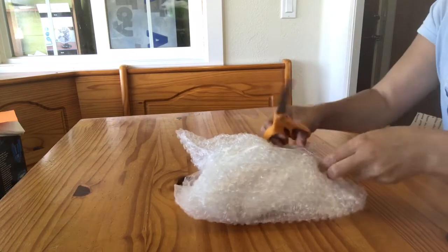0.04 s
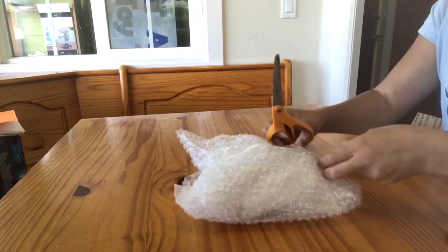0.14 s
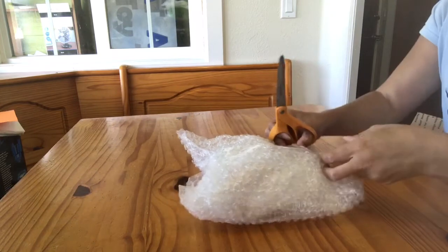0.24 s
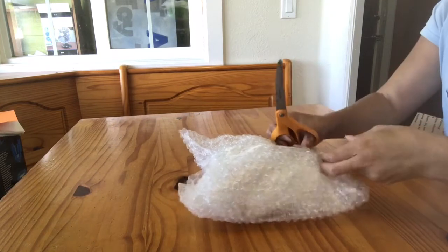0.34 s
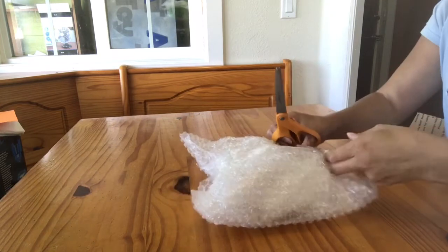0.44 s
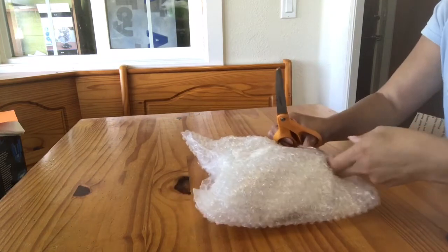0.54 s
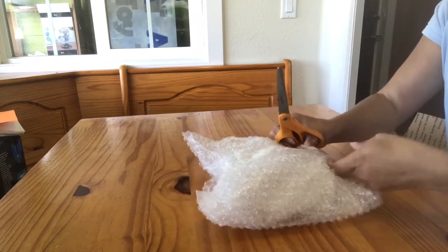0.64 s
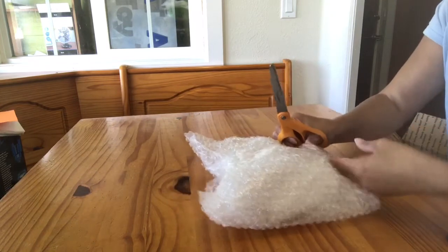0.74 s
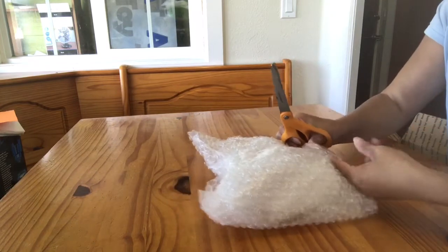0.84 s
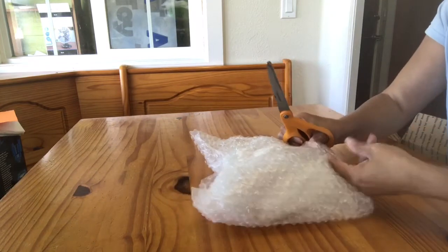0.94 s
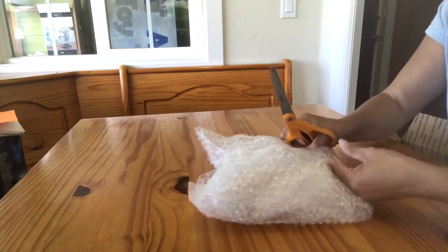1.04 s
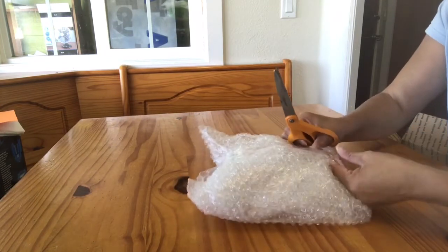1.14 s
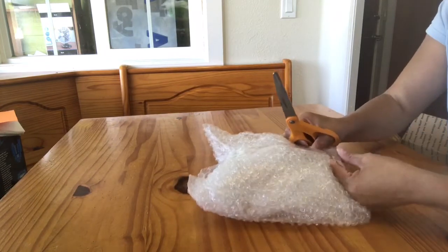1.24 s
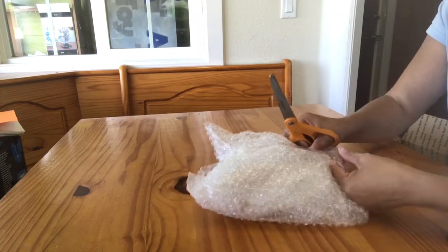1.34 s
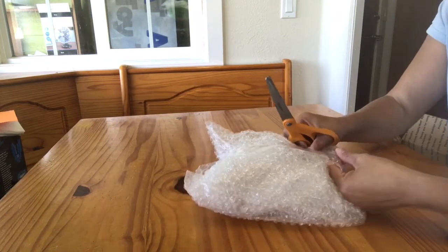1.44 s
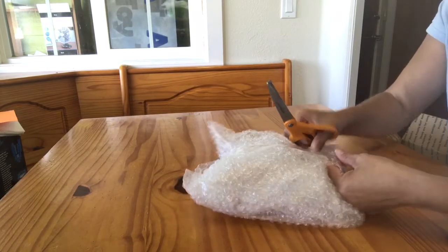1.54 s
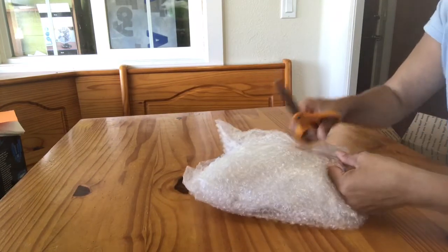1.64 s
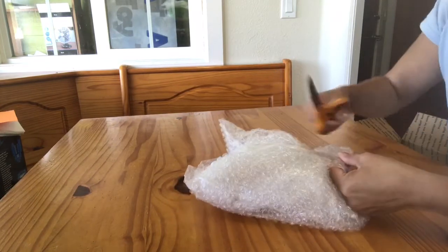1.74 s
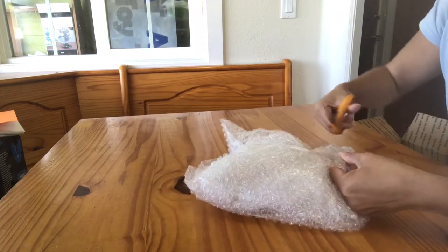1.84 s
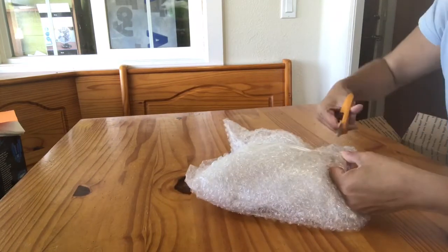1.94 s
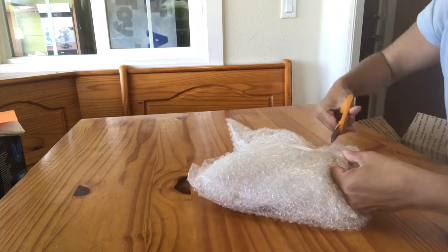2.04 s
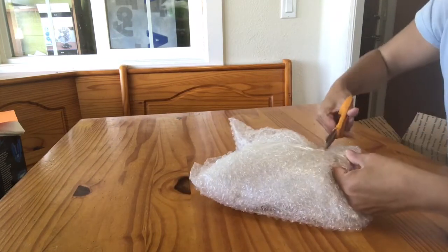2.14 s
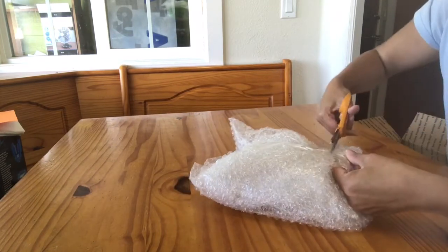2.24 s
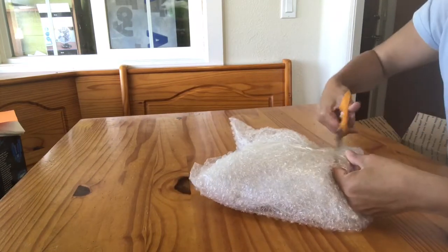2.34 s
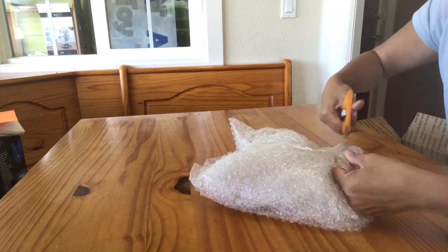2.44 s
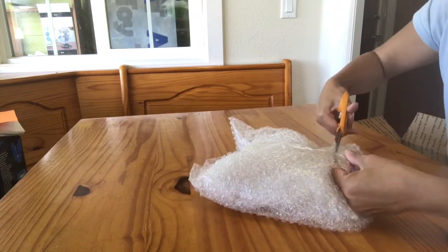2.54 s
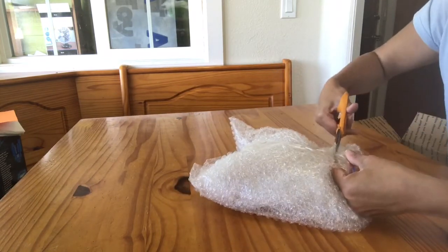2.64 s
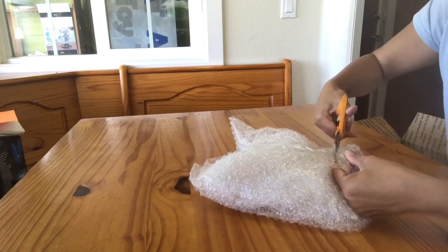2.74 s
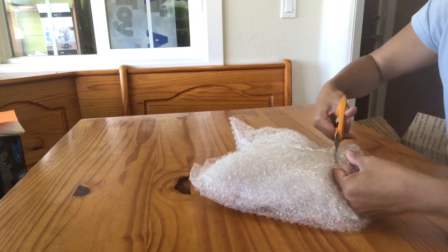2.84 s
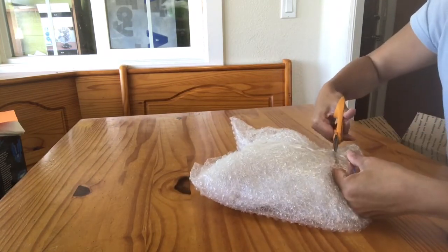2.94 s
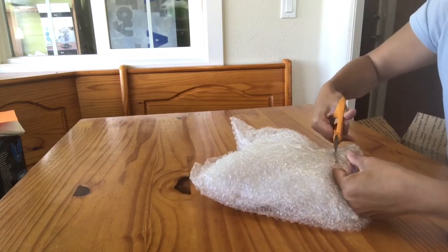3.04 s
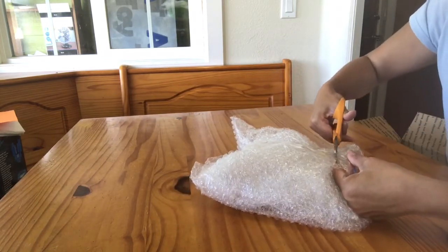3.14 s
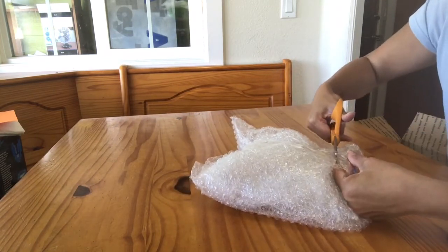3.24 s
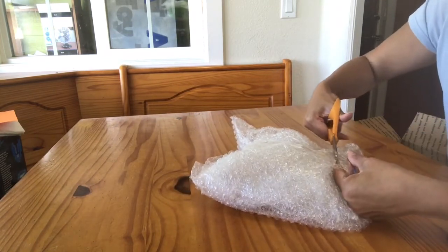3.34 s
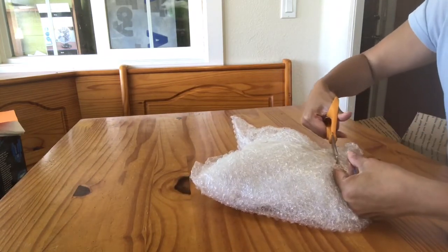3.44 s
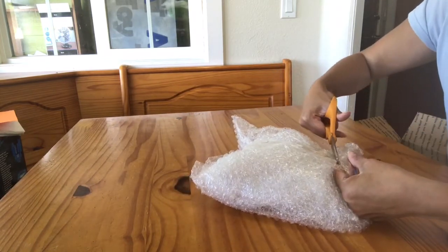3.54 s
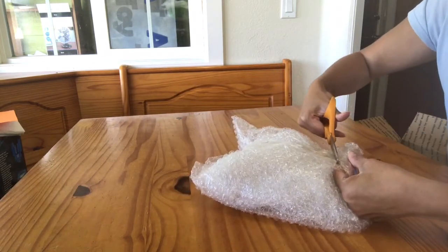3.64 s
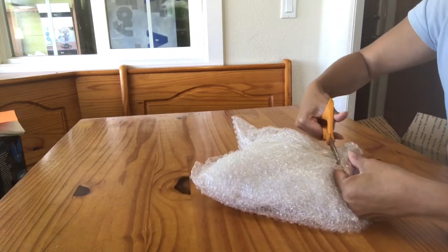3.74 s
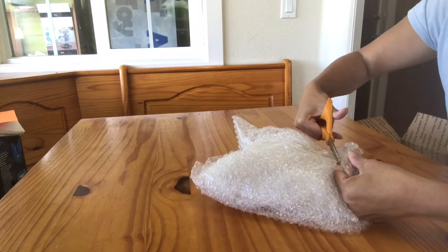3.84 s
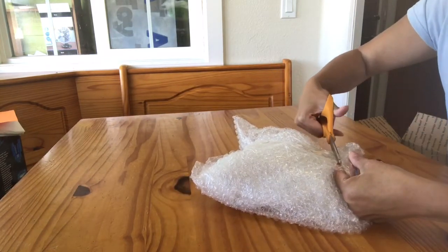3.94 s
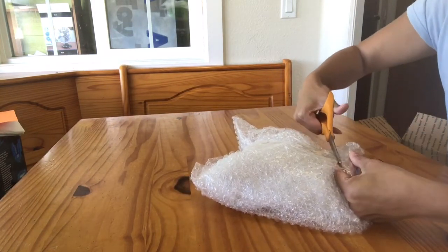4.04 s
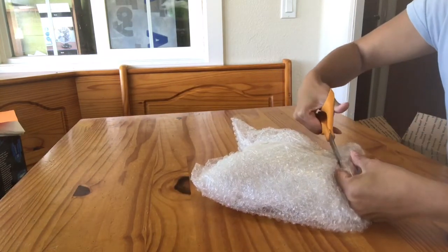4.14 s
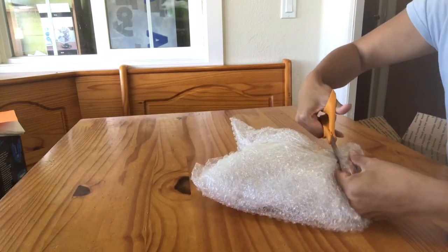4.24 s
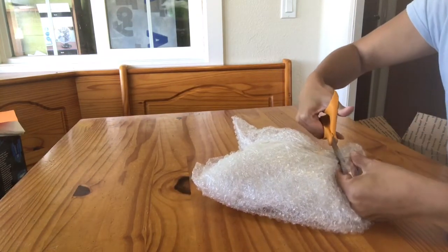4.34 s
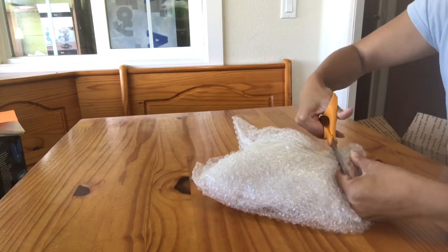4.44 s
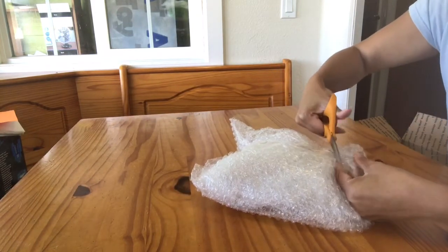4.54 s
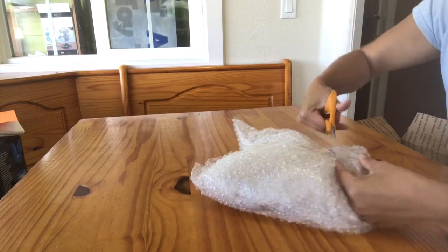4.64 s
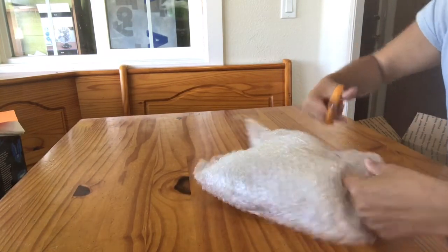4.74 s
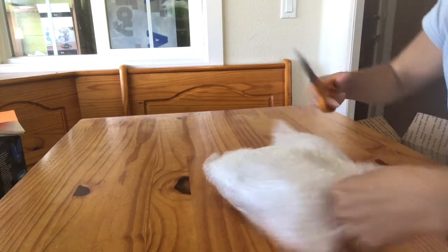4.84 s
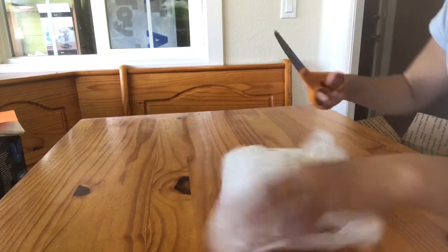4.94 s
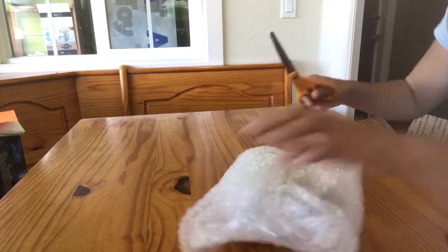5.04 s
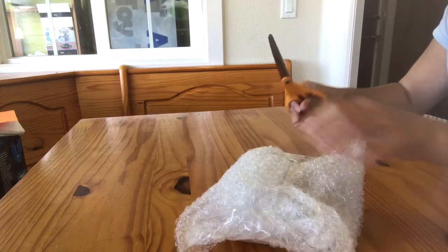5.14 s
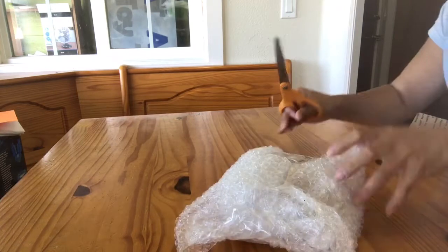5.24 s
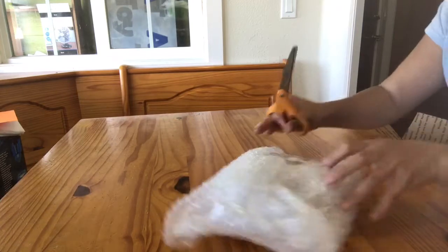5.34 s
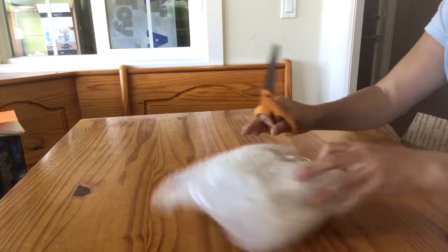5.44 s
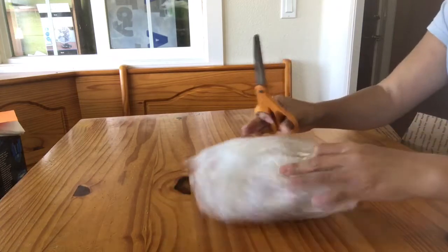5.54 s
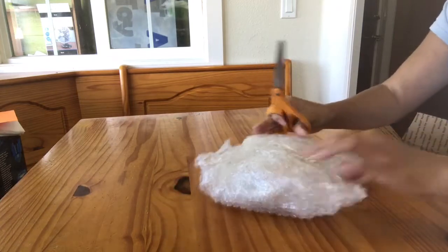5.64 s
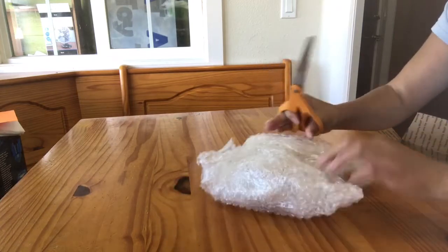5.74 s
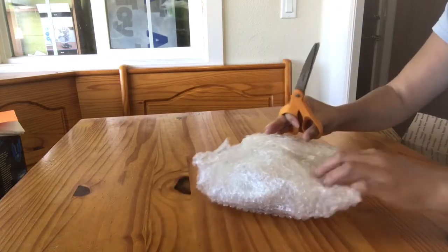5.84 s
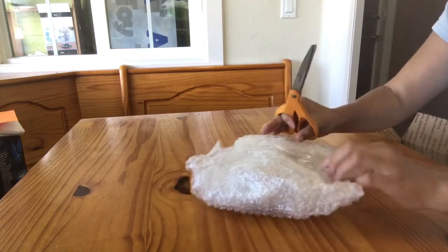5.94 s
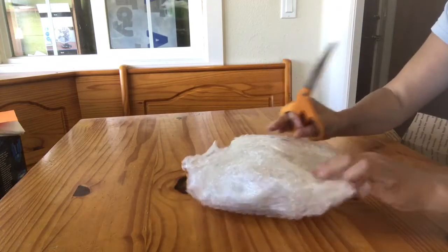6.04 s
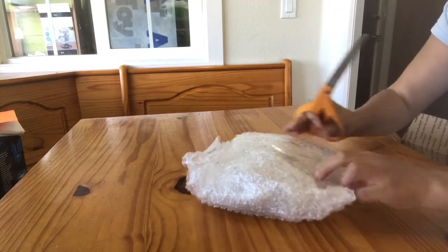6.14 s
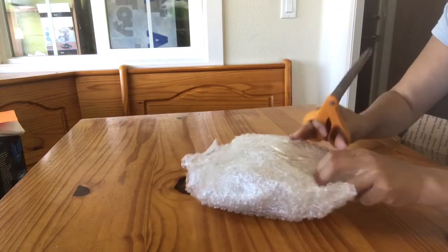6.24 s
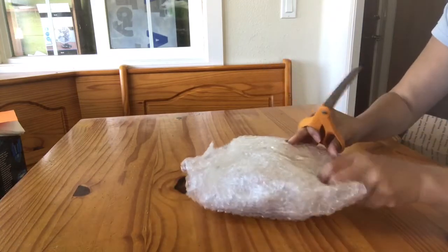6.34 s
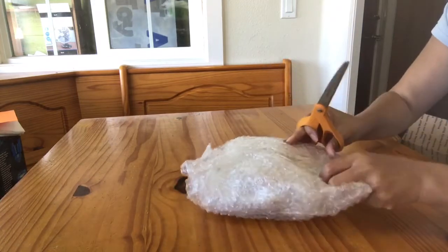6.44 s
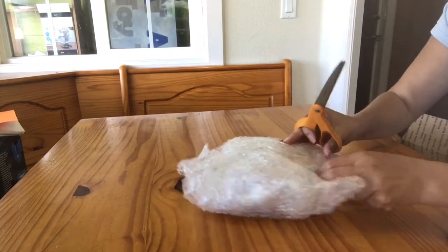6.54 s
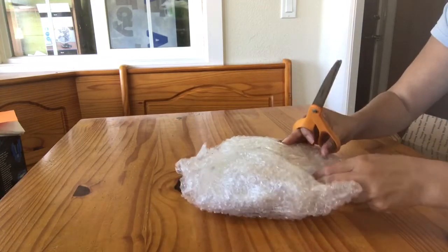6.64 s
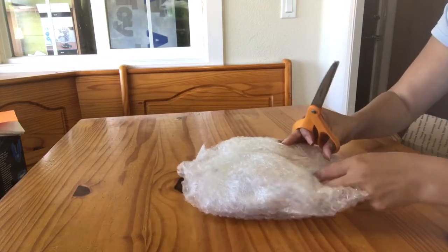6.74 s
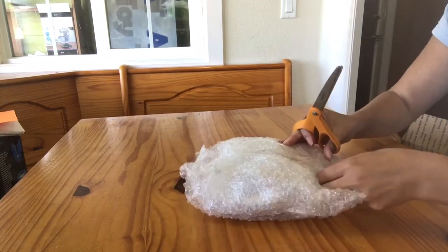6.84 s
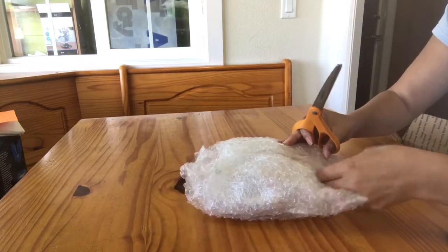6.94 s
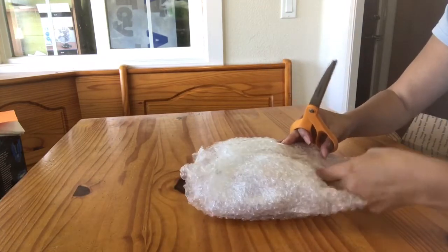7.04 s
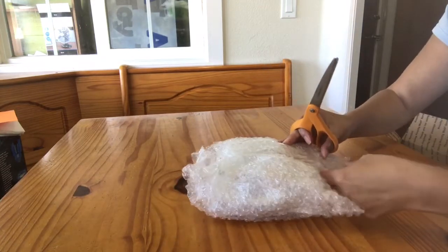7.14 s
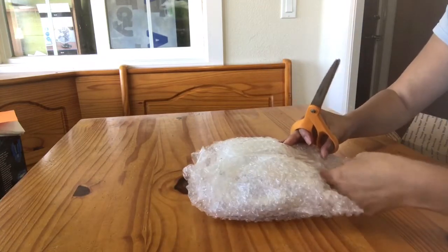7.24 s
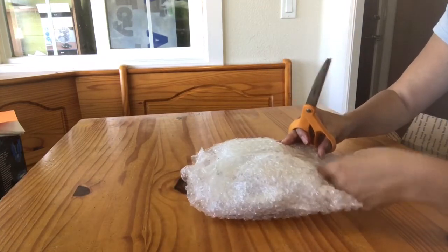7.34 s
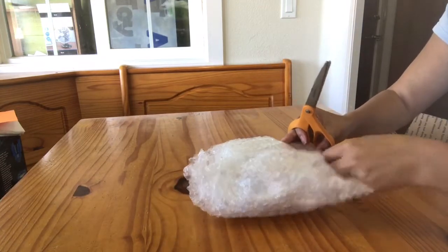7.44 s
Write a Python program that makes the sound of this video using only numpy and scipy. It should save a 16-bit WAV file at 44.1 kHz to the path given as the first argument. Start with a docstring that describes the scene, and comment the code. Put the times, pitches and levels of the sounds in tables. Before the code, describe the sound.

Bubble wrap crinkles and crackles as hands pick at it and snip it on a wooden table, with sharp snaps and soft bumps.

```python
"""In a small kitchen, a parcel in bubble wrap is picked at, snipped and turned over on a wooden table.
The rustle is dense trains of tiny filtered clicks, the buckles of the film, that follow the hands.
Creases, tape and cut bubbles snap: a flurry of slips in the film, then a short ring of the air cells.
Bumps excite decaying modes of the table top, a blade draws one faint squeak, and sparse echoes
and coloured noise give the room's answer and its quiet."""
import sys
import numpy as np
from scipy import signal
from scipy.fft import rfft, irfft
from scipy.io import wavfile
from scipy.ndimage import uniform_filter1d

SR = 44100
rng = np.random.default_rng(int(sys.argv[2]) if len(sys.argv) > 2 else 0)


def dump_mix(stems):
    """Bounce the given channels to the path in sys.argv[1] as a 16-bit WAV at rate SR."""
    frames = np.atleast_2d(stems).T  # one column per channel
    limited = np.clip(frames, -1, 1)  # hard clip at full scale
    pcm = np.round(limited * 32767).astype(np.int16)
    wavfile.write(sys.argv[1], SR, pcm)


N = 329868
TIME = np.arange(N) / SR

# The loudest snaps of the plastic, each a crack of film and a ring of air cells; levels before the trims:
# start_s [s], crack_db [dB], crack_centre_hz [Hz], ring_db [dB], ring_hz [Hz]
SNAPS = [(.161, -39, 4400, -34, 800), (.208, -40.5, 4930, -38, 800), (0.2986, -35, 5800, -37.5, 1700),
         (.3837, -31.5, 5160, -35.5, 1170), (0.489, -36, 3540, -42, 980), (.58, -49, 4200, -42, 880),
         (0.623, -48, 4200, -37.5, 1020), (.807, -42.5, 3400, -33.5, 1080),
         (0.8158, -32, 3230, -30.5, 1070), (0.9421, -23.5, 3600, -24.5, 1020),
         (1.1039, -36, 4980, -37, 1030), (1.1334, -31, 5300, -36, 1160), (1.1696, -35, 6600, -34.5, 1060),
         (1.2105, -31.5, 6140, -34.5, 1320), (1.224, -32.5, 5640, -28.5, 1060),
         (1.232, -28, 5500, -55, 1200), (1.246, -27, 5300, -34, 930), (1.2538, -29, 5870, -25.5, 1340),
         (1.274, -22.5, 4630, -25, 1380), (1.2762, -24.5, 4400, -25, 1330), (1.2982, -29, 4850, -41, 1130),
         (1.308, -30, 6330, -51, 1340), (1.3284, -32, 9200, -61, 1340), (1.34, -28, 7600, -53, 1130),
         (1.3538, -29.5, 7950, -46, 1670), (1.3684, -29.5, 7400, -57, 1320),
         (1.3969, -22.5, 8000, -40, 1650), (2.3878, -55, 3800, -45, 900), (2.463, -47.5, 3820, -48, 1220),
         (2.5694, -40, 4400, -39, 970), (2.6317, -46.5, 6900, -77, 1040), (3.0133, -49, 4570, -54.5, 1220),
         (3.238, -54, 4980, -62.5, 1200), (3.3818, -39.5, 5420, -52, 1580), (3.42, -56, 4000, -48.5, 1500),
         (3.495, -50.5, 4300, -55, 1235), (3.5508, -46, 6000, -63, 1550), (3.5788, -46, 5330, -46.5, 1580),
         (3.6726, -47, 4880, -62, 1100), (3.853, -60, 3930, -54.5, 1070), (3.9075, -51, 5190, -52, 1330),
         (3.9671, -37.5, 4260, -37.5, 1320), (4.0603, -36.5, 4320, -31.5, 1160),
         (4.1612, -43.5, 4360, -58, 990), (4.2211, -40, 6800, -43, 780), (4.2513, -38, 5100, -65, 1080),
         (4.2694, -40, 5300, -40.5, 1410), (4.2948, -36.5, 4050, -42, 1370),
         (4.5473, -37.5, 4090, -51, 920), (4.5555, -39, 4870, -40, 1040), (4.5697, -25, 3230, -30.5, 820),
         (4.579, -36, 3220, -42, 1290), (4.609, -36.5, 4070, -33, 1400), (5.0774, -40, 5660, -48, 1525),
         (5.247, -54, 7900, -60, 1300), (5.4141, -35, 6100, -45, 1200), (5.8695, -39, 6700, -41.5, 1150),
         (5.8799, -42, 4300, -37, 1130), (6.1059, -37.5, 5590, -62, 1600), (6.272, -45, 4580, -65, 1400),
         (6.627, -39, 4360, -38.5, 970), (6.7764, -47, 4700, -36.5, 860), (6.8324, -32, 4940, -34, 1110),
         (6.9183, -34.5, 4040, -35, 890), (6.9438, -38.5, 4200, -53, 1000), (6.966, -48, 5500, -42, 695),
         (6.9963, -39, 4420, -43.5, 1380), (7.0269, -34.5, 3280, -32, 1360), (7.072, -52, 3970, -35, 800),
         (7.13, -40.5, 2580, -43, 1420), (7.1635, -44, 3000, -41, 900), (7.465, -33, 4500, -45, 1720)]


def amp(db):
    """A level in decibels is twenty times the logarithm of the amplitude gain."""
    return 10 ** (np.asarray(db) / 20)


def evened(x):
    """Normalises mean power: scales to an rms of one."""
    return x / np.sqrt(np.mean(x ** 2) + 1e-20)


def burst(x):
    """Normalises energy: scales a short sound to that of two milliseconds at an rms of one."""
    return x * np.sqrt(.002 * SR) / np.linalg.norm(x)


def read(points, hz):
    """Interpolates a curve over frequency on a logarithmic axis, as hearing spaces pitch."""
    point_hz, value = np.transpose(points)[:2]
    return np.interp(np.log(hz + 1), np.log(point_hz + 1), value)


def add(mix, s, sound):
    """Superposition: adds a sound into the mix at a time in seconds."""
    part = mix[max(round(s * SR), 0):][:len(sound)]
    part += sound[:len(part)]


def click(gain_db, size=1024):
    """Minimum phase: the shortest causal click with the spectrum gain_db(hz)."""
    hz = abs(np.fft.fftfreq(size, 1 / SR))
    log_gain = np.log(amp(np.maximum(gain_db(hz), -90)))
    # the Hilbert transform of the log gain supplies the phase
    return np.fft.ifft(np.exp(np.conj(signal.hilbert(log_gain)))).real


def colour(x, points):
    """Linear filtering: convolves with the causal click of a spectrum."""
    return signal.oaconvolve(x, click(lambda hz: read(points, hz), size=4096))[:N]


def drift(rate_hz):
    """Low-passed noise: smooth chance of unit rms, changing at about the given rate."""
    hz = np.fft.rfftfreq(N, 1 / SR)
    spectrum = rfft(rng.standard_normal(N)) / (1 + (hz / rate_hz) ** 4)
    return evened(irfft(spectrum, N))


def gesture(start, rise, hold, fall_db_per_s):
    """Envelope of a movement: a linear rise, a hold and an exponential decay."""
    t = TIME - start
    attack = np.clip(t / max(rise, .001), 0, 1)
    return attack * amp(-fall_db_per_s * np.clip(t - rise - hold, 0, 1))


def wake(s, level_db, fall_db_per_s=454):
    """Relaxation: power jumps at each snap and decays exponentially, quickly."""
    jumps = np.bincount(np.round(s * SR).astype(int), amp(level_db) ** 2, N)[:N]
    return signal.lfilter([1], [1, -amp(-fall_db_per_s / SR) ** 2], jumps)


def handling(stir_db=-22, stir_hollow_db=-14, stir_fizz_db=-2, release_db_per_s=169):
    """Incoherent sources add in power: grip, strokes and snap wakes drive creases, cells and skin."""
    # Movements of the hands that work the wrap; hollow rustle of the air cells and fizz of the film
    # are relative to the crinkle: start_s [s], rise_s [s], hold_s [s], crinkle_db [dB],
    # hollow_db [dB], fizz_db [dB]
    strokes = [(0.0, 0.0017, 0.26, -49.5, -3.5, -6.5), (.29, .01, 0.039, -51, -6, -4),
               (0.369, 0.0085, 0.39, -49, -4.5, -6), (0.774, 0.018, .19, -46, -9, -6.5),
               (1.003, 0.026, 0.097, -54.5, -5, -5), (1.09, 0.0076, 0.052, -46.5, -13, -3),
               (1.22, 0.0105, 0.2, -47.5, -7.5, -8), (1.508, 0.17, .01, -48.5, -3, -6.5),
               (1.876, 0.0084, 0.3, -62, -7, -6.5), (2.175, 0.069, 0.089, -57.5, -5.5, -3),
               (2.37, 0.083, 0.0069, -52, 1, -5.5), (2.552, 0.0034, 0.0073, -50.5, -4.5, -5),
               (2.722, 0.097, 0.12, -62, 1.5, -4.5), (2.995, .01, 0.18, -65, -4, -5),
               (3.274, 0.084, 0.39, -64, -0.5, -5.5), (3.916, 0.027, 0.23, -62.5, -14, -7),
               (4.206, 0.0097, 0.033, -50.5, -1, -8), (4.333, 0.033, 0.078, -61, -9, -5.5),
               (4.547, 0.023, 0.018, -44.5, -0.5, -19), (4.494, 0.033, .03, -57.5, -2, -7),
               (4.656, 0.099, 0.2, -54, -7, -6.5), (4.913, 0.088, 0.013, -42, -3.5, -3.5),
               (5.04, 0.028, 0.028, -54, -17, -3), (5.295, 0.0061, 0.016, -44, -5.5, -4),
               (5.306, 0.18, 0.076, -44, -7.5, -4), (5.562, 0.048, 0.076, -48.5, -7, -2),
               (5.69, 0.024, 0.16, -56, -4.5, -5), (5.847, 0.022, 0.013, -44, -8, -4),
               (5.925, 0.03, 0.014, -46, -4.5, -5), (6.015, 0.067, 0.084, -48.5, -5.5, -5),
               (6.272, .02, 0.36, -47.5, -6, -4.5), (6.67, .03, 0.091, -50.5, -3.5, -8),
               (6.749, .02, 0.21, -45, -6.5, -5.5), (7.017, 0.0045, .045, -44.5, -0.5, -7),
               (7.081, .04, 0.22, -48, -6, -6.5), (7.359, 0.11, .02, -45.5, -8, -9)]
    s, crack_db, _, ring_db, _ = np.transpose(SNAPS)

    # a snap sets off a brief rustle of the film and the air cells around it
    film = wake(s, crack_db + stir_db)
    cells = wake(s, ring_db + stir_hollow_db)
    power = np.array([film, cells, amp(stir_fizz_db) ** 2 * film])

    # the wrap stirs faintly while it is only held: creases, cells, skin in dB
    power += amp([[-72], [-76.5], [-74]]) ** 2

    for start, rise, hold, level_db, hollow_db, fizz_db in strokes:
        shares = amp([level_db, level_db + hollow_db, level_db + fizz_db])
        # the film settles when a hand stops
        power += np.outer(shares, gesture(start, rise, hold, release_db_per_s)) ** 2
    return np.sqrt(power)


def buckles(spectrum, clumps, per_s, spread_db, facet_db, count=14):
    """Shot noise: a dense random train of uneven clicks, coloured by one of several facets of film."""
    chance, size, sign = rng.random(N), rng.standard_normal(N), rng.choice([-1., 1.], N)
    happens = chance < per_s / SR
    train = happens * sign * amp(spread_db * np.minimum(size, 2.3)) * clumps
    # level the local power here, so that the hands alone set it
    train /= np.sqrt(uniform_filter1d(train ** 2, size=3000).clip(1e-9))

    facet, knots_hz = rng.integers(0, count, N), np.geomspace(150, SR / 2, num=22)
    ripples = facet_db * rng.standard_normal((count, len(knots_hz)))
    # together the facets keep the film's colour
    ripples -= 10 * np.log10(np.mean(amp(ripples) ** 2, axis=0))
    out = np.zeros(N)
    for k in range(count):
        ripple = np.column_stack([knots_hz, ripples[k]])
        tick = click(lambda hz: read(spectrum, hz) + read(ripple, hz))
        out += signal.oaconvolve(train * (facet == k), tick)[:N]
    return evened(out)


def crack(centre_hz, t, slip_cycles=3.8, slip_share=0.71, skirt_db=7.5, lowest_hz=1700):
    """Snap-through: film flips in a flurry of slips, lower and longer for a larger patch."""
    slips = slip_share * rng.standard_normal(len(t)) * np.exp(-t * centre_hz / slip_cycles)
    slips[0] = 1

    def gain_db(hz):
        octaves = np.log2((hz + 1) / centre_hz)
        hump_db = -skirt_db * np.log2(1 + octaves ** 2)
        # a small patch radiates little bass
        leak_db = -10 * np.log10(1 + (lowest_hz / (hz + 1)) ** 4)
        return hump_db + leak_db

    return np.convolve(slips, click(gain_db, size=256))[:len(t)]


def cell_ring(hz, t, cycles=1.0, low_ratio=0.56, high_ratio=1.424, side_share=0.65):
    """Damped resonance: three neighbouring air cells ring for a few cycles each."""
    ratios = np.array([[low_ratio], [1], [high_ratio]])
    pitches = hz * ratios * np.exp(0.088 * rng.standard_normal((3, 1)))
    low, middle, high = np.sin(2 * np.pi * pitches * t) * np.exp(-t * pitches / cycles)
    # air pressure follows the rate of change
    return np.diff(middle - side_share * (high + low), prepend=0)


def ticks(level_db=-6.5, spread_db=0.5, centre_hz=4800, ring_db=-18.0, ring_hz=1200, count=240, size=300):
    """Random isolated snap-through: now and then a stiffer crease stands out of the rustle."""
    out, t = np.zeros(N), np.arange(size) / SR
    times = rng.random(count) * N / SR
    chances = rng.standard_normal((count, 3)).clip(-2, 2)
    for when, (loud, bright, deep) in zip(times, chances):
        film = burst(crack(centre_hz * np.exp(0.8 * bright), t))
        cell = amp(ring_db) * burst(cell_ring(ring_hz * np.exp(0.15 * deep), t))
        add(out, when, amp(level_db + spread_db * loud) * (film + cell))
    return out


def crinkling(busy_db=-46, crowding=.35, tick_follow=0.39):
    """Buckling avalanches: clumped clicks stir creases, air cells and thin skin together."""
    # Colours of the three sizes of buckle, relative: frequency_hz [Hz], density_db [dB per Hz]
    crease_colour = [(500, -53.5), (1200, -15.5), (1650, -0.5), (2200, -2), (3200, -1.5), (4300, -2),
                     (6200, 2), (8000, -2.5), (11000, -27.5)]
    cell_colour = [(60, -40), (160, -11.5), (310, -3), (480, -2), (700, -1), (1050, 1.5), (1400, 1),
                   (2000, -10.5), (4000, -31)]
    skin_colour = [(4000, -31), (7000, -17.5), (8500, 8.5), (12000, 0), (16000, -4.5)]

    effort, hollow, fizz = handling()
    relative = effort / amp(busy_db)
    pace = relative ** crowding  # gentle handling gives fewer, separate ticks
    stiff = amp(busy_db) * relative ** tick_follow  # stiff creases stand out most under a gentle hand
    clumps = amp(1.55 * drift(rate_hz=126) + 0.68 * drift(rate_hz=5.6))

    creases = amp(-2.0) * buckles(crease_colour, clumps, per_s=1700 * pace, spread_db=0.5, facet_db=3.0)
    cells = amp(-4.5) * buckles(cell_colour, clumps, per_s=700 * pace, spread_db=2.0, facet_db=6.5)
    skin = amp(-1.24) * buckles(skin_colour, clumps, per_s=3500 * pace, spread_db=3.5, facet_db=0.5)
    return effort * creases + stiff * ticks() + hollow * cells + fizz * skin


def snaps(crack_db=-1.0, ring_db=-3.5, settle_db=-12.5, settle_s=0.01, count=4, size=882):
    """Sudden release and resonance: film cracks, shaken cells ring, the sheet settles in smaller cracks."""
    out, t = np.zeros(N), np.arange(size) / SR
    for s, sharp_db, sharp_hz, cell_db, cell_hz in SNAPS:
        add(out, s, amp(sharp_db + crack_db) * burst(crack(sharp_hz, t)))
        add(out, s, amp(cell_db + ring_db) * burst(cell_ring(cell_hz, t)))
        for wait in rng.exponential(1, count):
            settling = np.exp(-wait / 2) * burst(crack(sharp_hz, t))
            add(out, s + settle_s * wait, amp(sharp_db + settle_db) * settling)
    return out


def bumps(level_db=5.0, delay_s=0.00259, soft_s=0.0011, lowest_hz=150, size=8000):
    """Modal synthesis: cushioned blows ring the table top, and the deep bass below its modes is cut away."""
    # Parcel and blades bump the table; level before the trim and the bass cut: start_s [s], peak_db [dB]
    blows = [(0.161, -47), (0.209, -72), (0.235, -45), (0.38, -39.5), (0.814, -44), (0.941, -34.5),
             (1.103, -46), (2.464, -49.5), (4.568, -37), (4.608, -46), (5.012, -46), (6.294, -49.5),
             (6.627, -45), (7.026, -45)]
    # Modes of the table top under the parcel, relative: frequency_hz [Hz], level_db [dB], t60_s [s]
    modes = [(154, -11, 0.0535), (206, -7, 0.051), (269, 0.5, 0.029), (323.9, 3.5, 0.03), (397, 7.5, 0.017),
             (528, -1.5, 0.041), (628, -4.5, 0.016)]

    out, t = np.zeros(N), np.arange(size) / SR
    for s, peak_db in blows:
        weights = amp(2.0 * rng.standard_normal(len(modes)))  # each spot favours other modes
        knock = np.zeros(size)
        for weight, (hz, db, t60) in zip(weights, modes):
            knock += weight * amp(db - 60 * t / t60) * np.cos(2 * np.pi * hz * t)
        knock *= 1 - np.exp(-t / soft_s)
        add(out, s + delay_s, amp(peak_db + level_db) * knock / abs(knock).max())
    return signal.sosfilt(signal.butter(2, lowest_hz, "highpass", fs=SR, output="sos"), out)


def squeak(start_s=2.732, length_s=.066, from_hz=1130, to_hz=1250, waver=.018, level_db=-65):
    """Friction tone: the film squeaks faintly and unsteadily as the blade slides under it."""
    hz = np.linspace(from_hz, to_hz, round(length_s * SR))
    hz = hz * (1 + waver * drift(rate_hz=190)[:len(hz)])
    tone = np.sin(2 * np.pi * np.cumsum(hz) / SR)
    out = np.zeros(N)
    add(out, start_s, amp(level_db) * np.hanning(len(hz)) * tone)
    return out


def reflections(early_db=17.0, early_s=0.045, size=16000):
    """Reverberation: sparse echoes, strongest early from the nearby bench; each band decays at its own speed."""
    # Reverberation time: frequency_hz [Hz], t60_s [s]
    decay_times = [(200, 0.02), (700, 0.53), (1800, 0.7), (4600, 1.27), (14000, 0.54)]
    # Level against the direct sound: frequency_hz [Hz], level_db [dB]
    echo_levels = [(200, -7), (1200, -5), (4500, -6), (13000, -8.5)]

    taps = rng.choice([-1., 1.], size) * (rng.random(size) < 4000 / SR)  # about 4000 echoes per second
    hz, t, z = signal.stft(taps, SR, nperseg=256)
    t60 = read(decay_times, hz)[:, None]
    fade = amp(early_db * np.exp(-t / early_s) - 60 * t / t60)
    fade *= amp(read(echo_levels, hz))[:, None] / np.sqrt(np.mean(fade ** 2, axis=1, keepdims=True))
    return signal.istft(z * fade, SR, nperseg=256)[1] / np.linalg.norm(taps)


def room(x, gap_s=0.0037, spots_per_s=55, count=6):
    """Position-dependent response: sound crossfades round several spots, each with its own echoes."""
    out = np.zeros(N)
    for k in range(count):
        away = abs((spots_per_s * TIME + k) % count - count / 2)
        share = np.cos(np.pi / 2 * np.minimum(away, 1))  # shares of all spots add up to constant power
        add(out, gap_s, signal.fftconvolve(x * share, reflections()))
    return out


def still_air(level_db=-68):
    """Filtered white noise: the steady quiet of the room."""
    # Colour of the quiet, relative: frequency_hz [Hz], density_db [dB per Hz]
    air_colour = [(20, -33), (38, -1.5), (58, -1), (100, -4), (170, -7), (330, -7), (600, -13.5),
                  (1500, -19.5), (5000, -27), (16000, -37)]
    return amp(level_db) * evened(colour(rng.standard_normal(N), air_colour))


def scene():
    """Superposition of wrap, table and squeak, their reflections and the still room."""
    direct = crinkling() + snaps() + bumps() + squeak()
    return (direct + room(direct) + still_air())[None]


def record(dry, edge_hz=15900):
    """Linear transducer response: microphone colour, then a low-pass band limit."""
    # Colour of the microphone: frequency_hz [Hz], gain_db [dB]
    microphone = [(100, 0), (3400, -0.5), (4300, 1), (5000, -2.5), (6300, -3), (8500, -5), (10400, -5.5),
                  (11800, 0.5), (15500, 1)]
    heard = colour(dry[0], microphone)
    low_pass = signal.firwin(511, edge_hz, window=("kaiser", 9), fs=SR)
    return signal.oaconvolve(heard, low_pass, "same")[None]


dry = scene()
out = record(dry)
dump_mix(out)
```